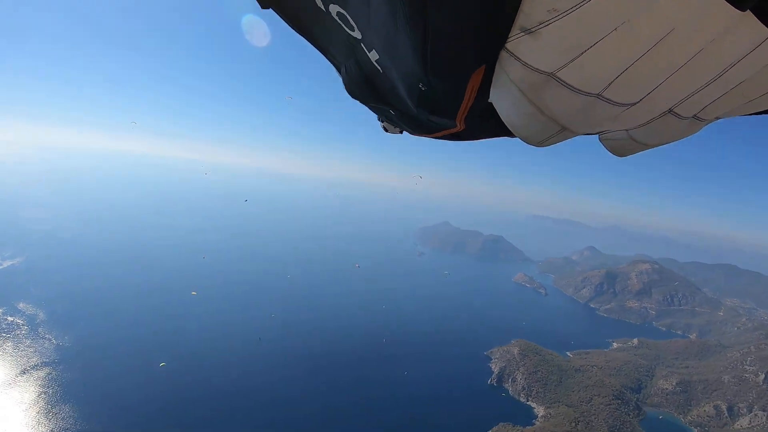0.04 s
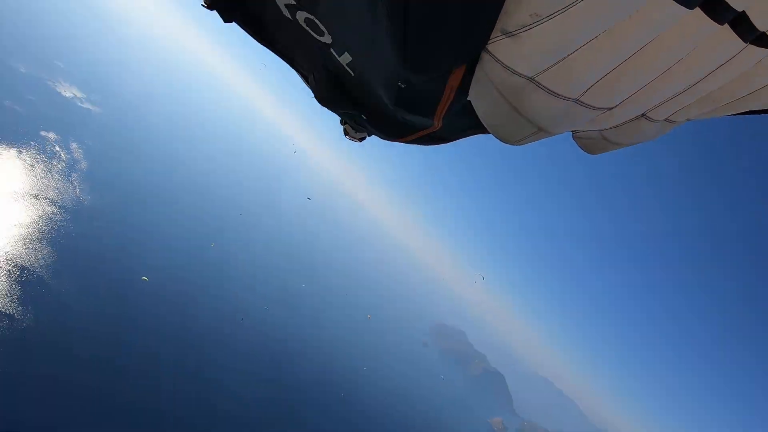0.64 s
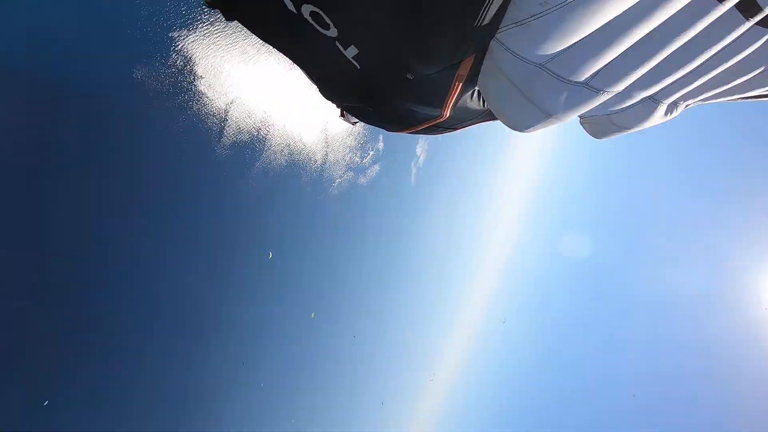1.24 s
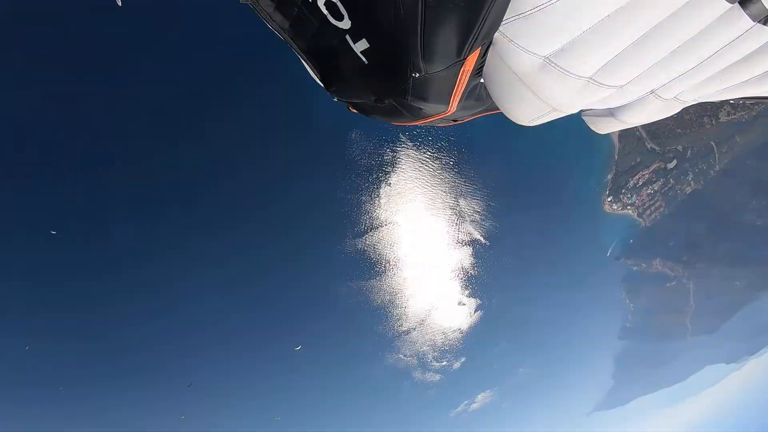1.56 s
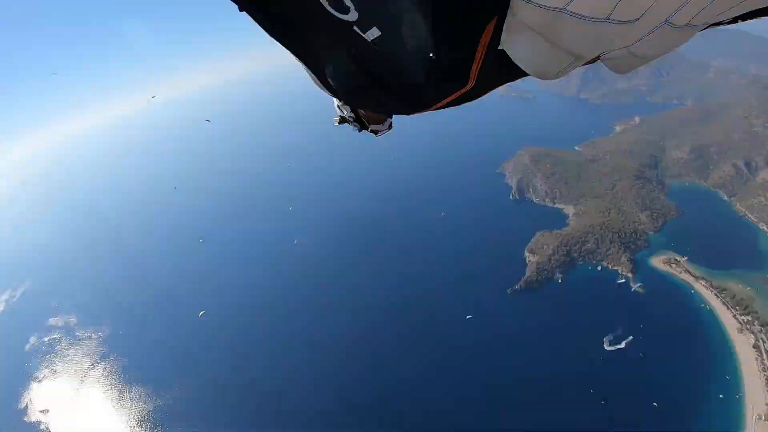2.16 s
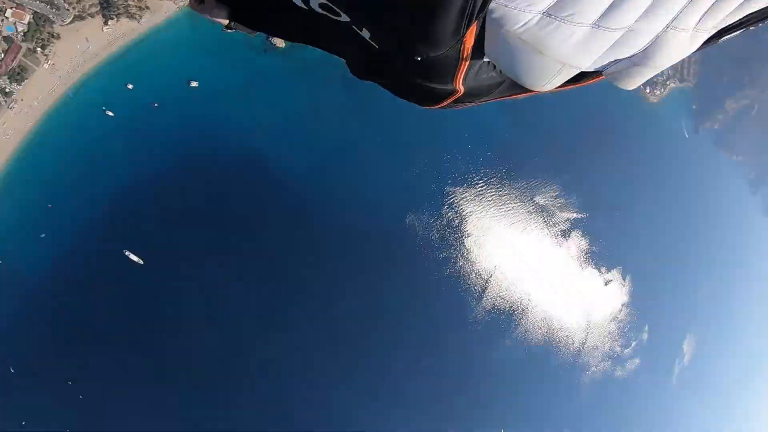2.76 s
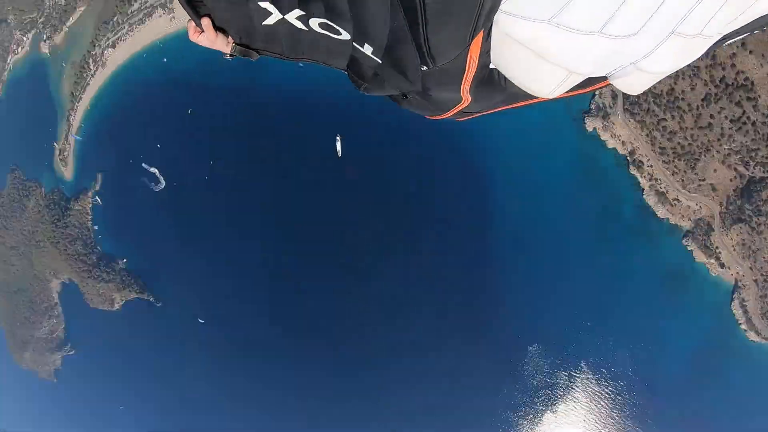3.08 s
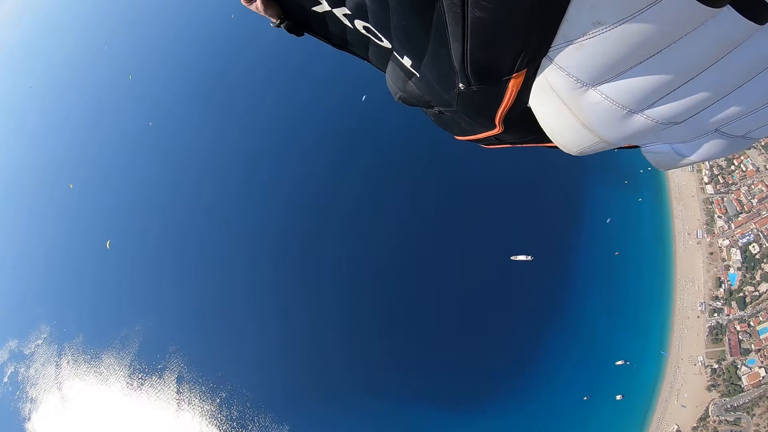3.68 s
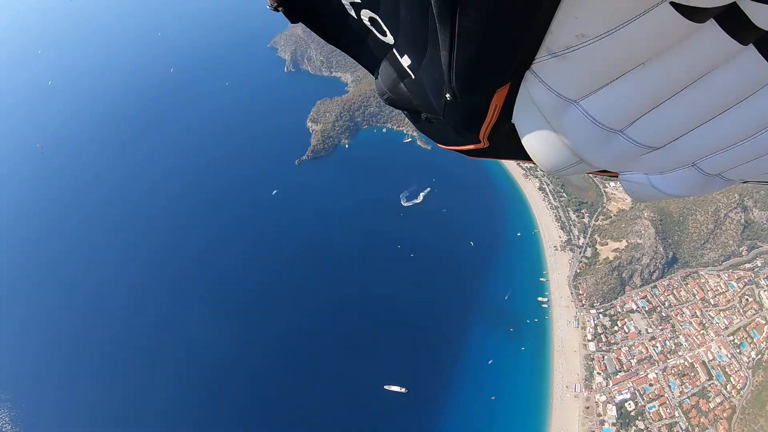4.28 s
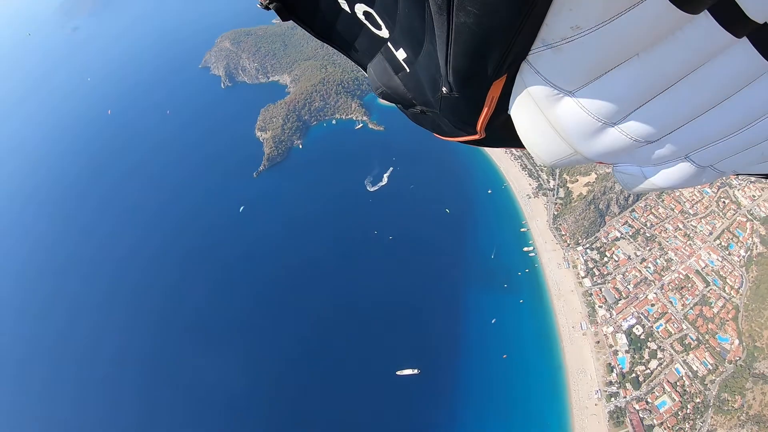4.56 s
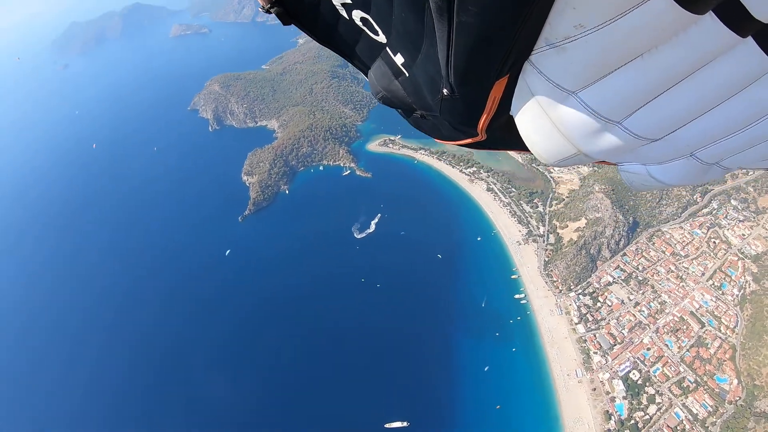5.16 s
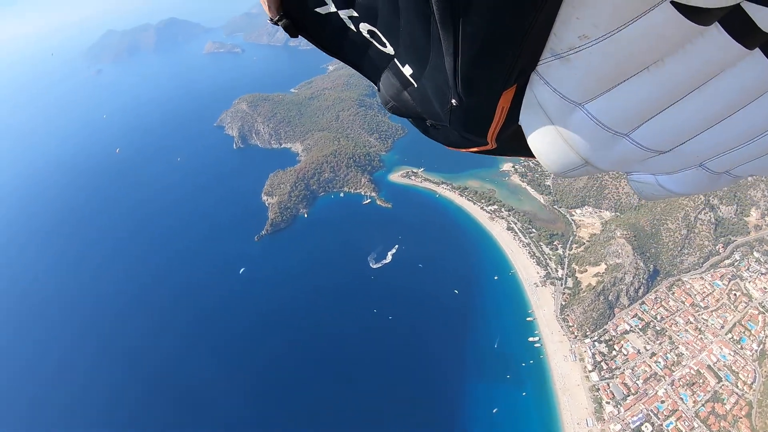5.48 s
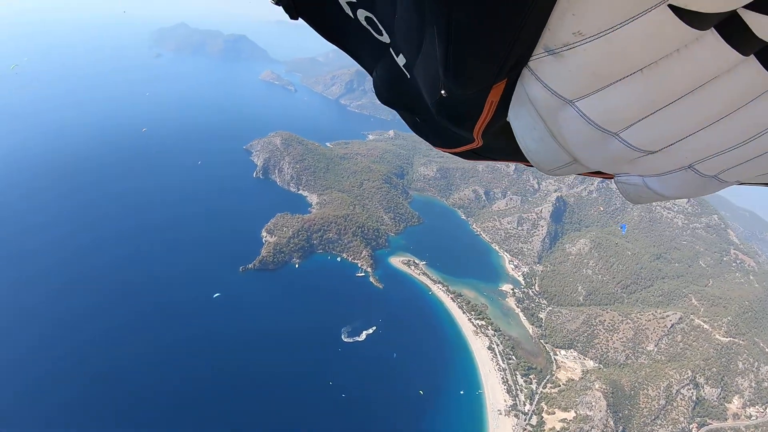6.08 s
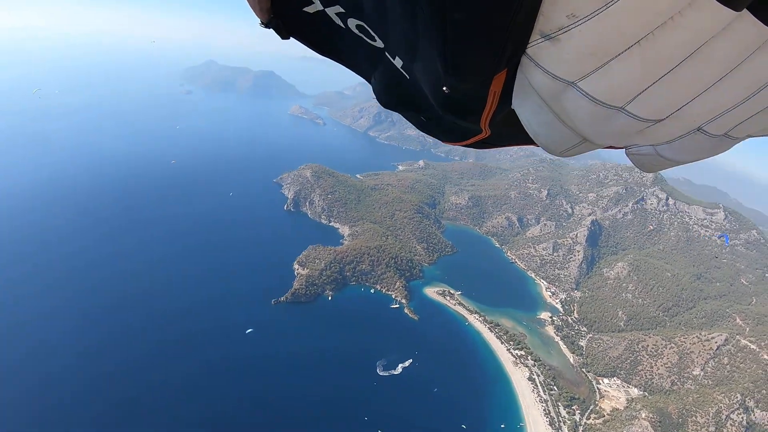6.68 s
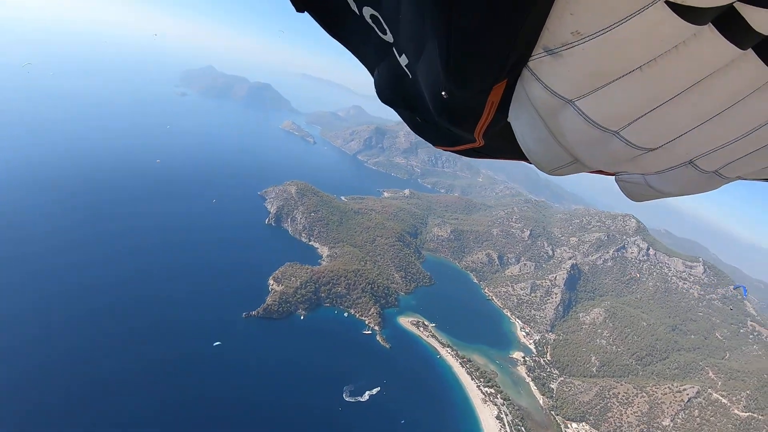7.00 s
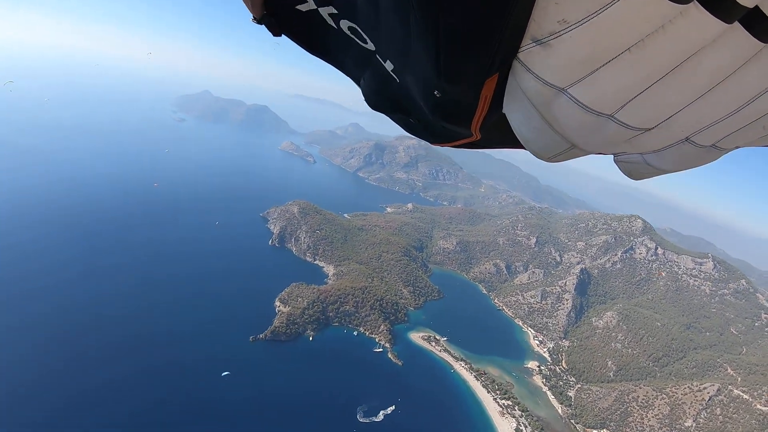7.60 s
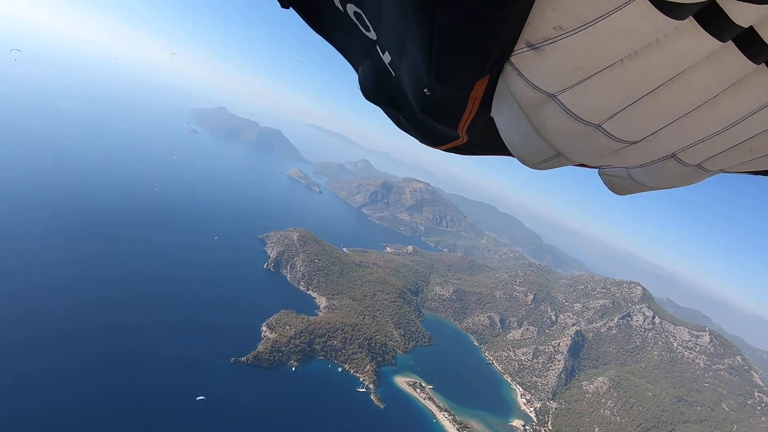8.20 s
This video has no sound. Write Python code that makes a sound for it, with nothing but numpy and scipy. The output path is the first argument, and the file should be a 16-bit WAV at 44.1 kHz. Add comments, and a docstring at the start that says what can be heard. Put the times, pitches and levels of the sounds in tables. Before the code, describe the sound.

Loud wind buffets the microphone with a fluttering rumble, a wavering drone and gusts of hiss.

```python
"""Wind on a wingsuit camera

Open air, one small camera riding on a flyer who rolls and then levels out; mono, with the wind right
on the microphone. Eddies buffet the port and the airstream roars over the housing, brighter whenever it
strikes the port. The port's narrow cavity hisses at its resonance, and vortices drone just behind
the camera. A fast limiter in the camera holds the buffeting down."""
import sys
import numpy as np
from scipy.fft import rfft, irfft, next_fast_len
from scipy.io import wavfile
from scipy.ndimage import uniform_filter1d, minimum_filter1d, map_coordinates

SR = 44100
rng = np.random.default_rng(int(sys.argv[2]) if len(sys.argv) > 2 else 0)


def digitize_waveform(pressure):
    """Quantize a signal to 16-bit integers and store it at the path in sys.argv[1].

    Rows of a 2-D input are taken as channels; values are limited to [-1, 1].
    """
    field = np.atleast_2d(pressure).T
    bounded = np.clip(field, -1, 1)
    quanta = np.round(bounded * 32767).astype(np.int16)
    wavfile.write(sys.argv[1], SR, quanta)


N = 372644

# large eddies, weakest in the middle of the roll: (time [s], buffet level [dB], roar level [dB])
LARGE_EDDIES = [(0, -9.5, -19), (.45, -16, -20), (1.2, -14, -20), (1.44, -14, -19.5), (1.6, -13.5, -19),
                (2.28, -17, -21.5), (2.36, -24, -20.5), (2.48, -20, -23), (2.8, -16.5, -18.5),
                (3.12, -20, -18), (3.3, -16, -25), (3.5, -18, -25), (3.8, -17.5, -25), (4.05, -15, -20.5),
                (4.22, -10.5, -23), (4.4, -12.5, -21.5), (4.6, -17.5, -20), (5.3, -16, -20),
                (5.9, -11.5, -19.5), (6.35, -16, -21.5), (6.75, -15, -20.5), (7.2, -14, -19.5),
                (7.75, -14, -19), (8.15, -20, -21), (8.45, -14, -20)]
# deepest thumps on the diaphragm: (time [s], level [dB])
THUMP_LEVEL = [(0, -17), (.35, -20.5), (.8, -21.5), (1.65, -18.5), (2, -26), (2.25, -21.5), (2.6, -25),
               (3.1, -21), (3.43, -26), (3.7, -25), (4.2, -19), (4.42, -19), (5.05, -24.5), (5.7, -19.5),
               (6.3, -24), (6.73, -18.5), (7.15, -24), (7.68, -18), (8.15, -24.5)]
# steady flow over the housing, under the gusts: (time [s], rush level [dB])
STEADY_FLOW = [(0, -26), (.39, -27.5), (.83, -23), (.93, -27.5), (1.65, -29), (2.08, -22.5), (2.72, -24.5),
               (2.95, -30), (3.25, -23.5), (3.95, -26.5), (4.23, -29.5), (5.03, -30), (5.36, -26),
               (5.8, -28), (6.42, -26), (6.81, -31), (7.15, -28), (7.8, -29.8), (8.45, -26.5)]
# the airstream swings onto the port: (start [s], hold [s], strength [dB], fizz flare [dB])
PORT_GUSTS = [(.12, 0.16, 2, 5), (.52, 0.35, 1.3, 1.5), (1.12, 0.051, 2.5, 3), (3.78, 0.2, 2.5, 6),
              (4.095, 0.037, 4.5, 6), (4.495, 0.12, 3.5, 6.5), (5.08, 0.1, 4.5, 5.5), (5.27, 0.37, 3.5, 3),
              (6.01, 0.075, 3.5, 8.5), (6.655, 0.065, 5, 6), (6.91, .12, 5, 6), (7.455, 0.13, 4.5, 3.5),
              (8.025, 0.082, 3, 7), (8.37, .1, 3.5, 2.5)]
RUSH_PER_GUST, HISS_PER_GUST = 1.27, 0.67  # dB for each dB of gust
# the port is briefly sheltered: (start [s], hold [s], rush change [dB], hiss change [dB])
PORT_LULLS = [(.34, 0.043, -4, -0.5), (2.82, 0.12, -6, -3.5), (4.235, .08, 1, -4.5), (4.4, .05, -3, -0.5),
              (5.645, .115, -4.5, -1), (5.92, 0.09, -5, -.5), (6.1, 0.05, -4.5, -2.5), (6.77, 0.092, 1, 0),
              (7.68, 0.09, -1.5, -1), (7.8, 0.09, 0.5, -4)]
LULL_ATTACK_S, LULL_RELEASE_S = 0.026, 0.045
# hollow tone of air crossing the housing's edge: (time [s], centre [Hz], level [dB])
EDGE_TONE = [(0, 1100, -52), (.45, 1148, -40), (.82, 1150, -30), (.98, 1102, -32), (1.5, 1097, -31),
             (1.85, 1250, -26.5), (2.15, 1753, -33.5), (2.9, 1200, -44), (3.5, 1330, -27.5),
             (4.03, 1298, -28.5), (4.2, 1200, -39), (5.05, 900, -44), (5.3, 848, -23), (5.6, 950, -34),
             (5.72, 1000, -46), (5.98, 1001, -44), (6.05, 999.5, -30), (6.45, 1221, -30), (6.67, 1196, -26),
             (6.77, 1180, -44), (6.88, 1197, -41), (7.3, 1101, -30), (7.55, 1246, -28.5), (7.7, 1101, -41),
             (7.98, 1048, -46), (8.1, 997, -34), (8.45, 904, -28)]
# vortices just behind the camera: (time [s], shedding rate [Hz], level [dB])
WAKE_VORTICES = [(0, 221.5, -20), (.45, 329, -41), (.65, 515, -24), (1, 299.2, -30), (1.25, 280.3, -26),
                 (1.5, 200.2, -35), (1.95, 280, -21.5), (2.35, 288.2, -34), (2.55, 286, -24.5),
                 (2.95, 270, -27), (3.2, 169.2, -33), (3.45, 120.2, -23), (3.7, 130.4, -17.5),
                 (4, 190, -23), (4.23, 300, -16.5), (4.38, 249.6, -26), (4.65, 180.5, -16),
                 (5, 162.3, -14.5), (5.15, 150.4, -19.5), (5.35, 198.8, -43), (5.65, 330.3, -27),
                 (5.9, 400.3, -21), (6.15, 247.6, -27), (6.42, 219.4, -34), (6.68, 278.8, -17.5),
                 (6.95, 272, -23.5), (7.2, 199, -30), (7.45, 160, -21.5), (7.8, 159.8, -17),
                 (8.15, 169.6, -21), (8.45, 189.4, -17.5)]
# the port faces the wind or lies in the lee as the flyer rolls: (time [s], hiss level [dB])
PORT_EXPOSURE = [(0, -32), (.45, -29.5), (.8, -32), (1.4, -32.8), (1.87, -31), (1.98, -28.5), (2.57, -25.5),
                 (2.82, -34), (3.04, -35), (3.23, -24.8), (3.33, -26.5), (3.48, -30.3), (4.2, -30.3),
                 (4.6, -31.5), (5.69, -30.5), (6.44, -32.5), (6.9, -32), (7.1, -34), (7.42, -35),
                 (7.66, -31), (7.85, -31.5), (8.25, -34.5), (8.45, -31)]
# treble fizz, relative to the port's exposure: (time [s], level [dB])
FIZZ_BALANCE = [(.08, -17), (.35, -11), (.85, -12), (1.0, -16), (1.9, -15.5), (2.6, -13), (3.3, -12.5),
                (3.6, -15.5), (4.3, -15.5), (4.65, -11.5), (5.2, -13), (5.7, -10), (5.85, -14),
                (6.5, -12.5), (6.86, -11), (7.3, -14), (7.66, -9), (7.77, -15.5), (8.45, -11)]
# airy whistle at the port's lip, sinking in the longer gusts: (time [s], pitch [Hz])
LIP_WHISTLE = [(.1, 5333), (.19, 4900), (.3, 4948), (.43, 5150), (.56, 4880), (.68, 4650), (.8, 4850),
               (.92, 5350), (1.55, 5050), (2.1, 5500), (3.05, 5480), (3.65, 5284), (4, 5450), (5, 5420),
               (5.2, 5100), (5.33, 4950), (5.58, 4950), (5.78, 5800), (5.9, 5422), (6.12, 5321),
               (6.21, 5950), (6.34, 5344), (6.86, 5475), (6.99, 4964), (7.1, 5436), (7.42, 5377),
               (7.55, 4893), (7.67, 5450), (7.755, 6250), (7.87, 5420), (8.3, 5330), (8.42, 4981)]
WHISTLE_REST_HZ, WHISTLE_WANDER_HZ, WHISTLE_FULL_BEND_HZ = 5440, 99.4, 450
# a long gust slips off the port: (start [s], length [s], level before the port's loss [dB])
GUST_SLIPS = [(.89, 0.21, -42), (5.608, .22, -38), (7.603, 0.21, -44)]
SLIP_START_HZ, SLIP_END_HZ, SLIP_LOSS_DB_PER_OCTAVE = 9500, 5870, 34

# colours of the wind at the microphone: (frequency [Hz], relative level [dB])
THUMP_SPECTRUM = [(8, -23.5), (20, 0), (32, -3.5), (55, 1.5), (75, 4.5), (110, -13.5), (250, -50)]
BUFFET_SPECTRUM = [(35, -28), (65, -3), (90, -2), (120, 0.5), (160, -0.5), (240, -4.5), (330, -15),
                   (600, -28), (1500, -70.5)]
ROAR_SPECTRUM = [(130, -30.5), (240, -3.5), (320, 0.5), (500, -4), (720, -8), (1000, -16), (1600, -22),
                 (3000, -41), (6000, -78)]
RUSH_SPECTRUM = [(350, -20), (650, -0.5), (950, 1), (1300, -2), (1750, -6), (2300, -11.5), (2800, -15),
                 (3300, -20.5), (4500, -20), (7000, -51)]
CAVITY_SPECTRUM = [(2200, -21.5), (3400, -21), (4000, -11), (4700, -3), (5500, -2), (6100, -3.5),
                   (7000, -13.5), (8200, -30), (10000, -46.5)]
FIZZ_SPECTRUM = [(3000, -6.5), (5000, 1.5), (7000, -5.5), (8000, -4), (9000, -12.5), (10000, -24),
                 (11000, -33.5), (12000, -47.5), (14300, -47.5), (15500, -47)]
PUFF_SPECTRUM = [(5, 4), (30, 3.5), (120, -8), (400, -5), (900, -37)]
# shapes of the pitched bands: (offset from centre [Hz], relative level [dB])
EDGE_BAND = [(2, 6), (170, -1.5), (380, -9), (650, -19), (950, -35.5)]
WAKE_BAND = [(2, -5.5), (15, 1), (45, -7.5), (80, -9.5), (170, -28.5)]
WHISTLE_BAND = [(2, -5.5), (170, -5), (360, -8.5), (680, -11.5), (1300, -25)]
SLIP_BAND = [(2, 1), (330, 1), (650, -8), (1200, -26)]


def buffeting():
    """Large eddies press right on the diaphragm: slow thumps under a throbbing rumble."""
    buffet_db, _ = curves(LARGE_EDDIES)
    thump_db, = curves(THUMP_LEVEL)
    thump_gain = amp(thump_db + 1.6 * wobble(12))
    thump = thump_gain * unit(limiter(noise(THUMP_SPECTRUM), ceiling_db=2.5, hold_s=0.037))
    rumble = amp(buffet_db + 1.06 * wobble(14)) * noise(BUFFET_SPECTRUM)
    return limiter(thump + rumble, ceiling_db=-6.5, hold_s=0.015)


def airstream(flutter):
    """Smaller eddies roar and rush over the housing around the microphone; its edge sounds hollow."""
    _, roar_db = curves(LARGE_EDDIES)
    flow_db, = curves(STEADY_FLOW)
    gust_db, _ = swells(PORT_GUSTS, attack_s=0.026, release_s=0.023)
    lull_db, _ = swells(PORT_LULLS, LULL_ATTACK_S, LULL_RELEASE_S)
    rush_db = flow_db + RUSH_PER_GUST * gust_db + lull_db
    edge_hz, edge_db = curves(EDGE_TONE)
    roar = amp(roar_db + 0.37 * wobble(14) + 0.5 * flutter) * noise(ROAR_SPECTRUM)
    rush = amp(rush_db + 0.47 * wobble(22) + 1.3 * flutter) * noise(RUSH_SPECTRUM)
    edge = amp(edge_db) * narrow_noise(edge_hz, EDGE_BAND)
    return roar + rush + edge


def wake():
    """Vortices peel off just behind the camera at a loose, wandering rate: a throaty drone."""
    shedding_hz, level_db = curves(WAKE_VORTICES)
    throb_db = 1.5 * wobble(18)
    wandering_hz = shedding_hz * (1 + 0.09 * wobble(40))
    return amp(level_db + throb_db) * narrow_noise(wandering_hz, WAKE_BAND)


def port_hiss(flutter):
    """The finest turbulence rings the microphone port's cavity, whistles at its lip and fizzes on top."""
    _, lull_db = swells(PORT_LULLS, LULL_ATTACK_S, LULL_RELEASE_S)
    exposure_db = curves(PORT_EXPOSURE)[0] + lull_db + 0.59 * wobble(22)
    # the hiss hangs on after a gust a little longer than the rush
    gust_db, flare_db = swells(PORT_GUSTS, attack_s=0.024, release_s=0.063)
    whistle_hz, = curves(LIP_WHISTLE)
    bend = np.minimum(np.abs(whistle_hz - WHISTLE_REST_HZ) / WHISTLE_FULL_BEND_HZ, 1)
    whistle_gain = amp(-3 + 4.5 * bend)  # against the cavity, louder when bent from rest
    whistle = whistle_gain * narrow_noise(whistle_hz + WHISTLE_WANDER_HZ * wobble(25), WHISTLE_BAND)
    # cavity and whistle share the power of the flow
    ring = (noise(CAVITY_SPECTRUM) + whistle) / np.sqrt(1 + whistle_gain ** 2)
    hiss = amp(exposure_db + HISS_PER_GUST * gust_db + 1.23 * flutter + 0.52 * wobble(70)) * ring
    fizz_db = exposure_db + curves(FIZZ_BALANCE)[0] + flare_db
    fizz = amp(fizz_db + 1.2 * flutter + 0.5 * wobble(5.8)) * noise(FIZZ_SPECTRUM)
    return hiss + fizz


def gust_slips(flutter):
    """As the airstream slips off the port, a faint, thin hiss falls to the cavity's pitch and fades."""
    t = np.arange(N) / SR
    hiss = np.zeros(N)
    for start, length, level_db in GUST_SLIPS:
        progress = np.clip((t - start) / length, 0, 1)
        pitch_hz = SLIP_END_HZ + (SLIP_START_HZ - SLIP_END_HZ) * (1 - progress) ** 2
        # the port passes less the further the pitch lies above its resonance
        loss_db = SLIP_LOSS_DB_PER_OCTAVE * np.log2(pitch_hz / SLIP_END_HZ)
        envelope = np.sqrt(np.abs(np.sin(np.pi * progress)))
        hiss += amp(level_db - loss_db) * envelope * narrow_noise(pitch_hz, SLIP_BAND)
    return amp(flutter) * hiss


def amp(db):
    """Decibels to gain."""
    return 10 ** (np.asarray(db) / 20)


def unit(x):
    """Scale to rms 1."""
    return x / np.sqrt(np.mean(x ** 2) + 1e-20)


def curves(rows):
    """One value per sample for each column after the time."""
    times, *columns = np.transpose(rows)
    return [np.interp(np.arange(N) / SR, times, column) for column in columns]


def swells(rows, attack_s, release_s):
    """Each (start, hold, ...) row rises, holds and falls away; one curve for each further column."""
    t = np.arange(N) / SR
    starts, holds, *columns = np.transpose(rows)
    ramps = [np.minimum((t - start) / attack_s, 1 - (t - start - hold) / release_s)
             for start, hold in zip(starts, holds)]
    envelopes = np.clip(ramps, 0, 1)
    return [column @ envelopes for column in columns]


def wobble(rate_hz):
    """A smooth random curve through rate_hz knots a second."""
    knots = rng.standard_normal(int(N * rate_hz / SR) + 4)
    return map_coordinates(knots, [np.arange(N) * rate_hz / SR])


def filtered(x, response):
    """Filter x by a gain given as a function of frequency."""
    size = next_fast_len(N + 8192)
    hz = np.fft.rfftfreq(size, 1 / SR)
    return irfft(rfft(x, size) * response(hz), size)[:N]


def noise(spectrum):
    """Noise of rms 1 coloured by (frequency [Hz], level [dB]) points, silent outside them."""
    points_hz, points_db = np.transpose(spectrum)

    def colour(hz):
        return amp(np.interp(np.log(hz + 1), np.log(points_hz), points_db, left=-120, right=-120))
    return unit(filtered(rng.standard_normal(N), colour))


def narrow_noise(centre_hz, band):
    """Noise of rms 1 around a moving centre, shaped on both sides by band."""
    phase = 2 * np.pi * np.cumsum(centre_hz) / SR
    return unit(noise(band) * np.cos(phase) + noise(band) * np.sin(phase))


def limiter(x, ceiling_db, hold_s):
    """Turn the gain down smoothly around every peak above the ceiling."""
    span = max(int(hold_s * SR), 2)
    needed_gain = np.minimum(1, amp(ceiling_db) / (np.abs(x) + 1e-9))
    return x * uniform_filter1d(minimum_filter1d(needed_gain, span), span)


def scene():
    """The wind at the microphone; it flutters in quick puffs, partly in step with the large eddies."""
    pressure = buffeting()
    flutter = unit(noise(PUFF_SPECTRUM) + 0.42 * unit(pressure))
    wind = pressure + wake() + airstream(flutter) + port_hiss(flutter) + gust_slips(flutter)
    return wind[None]


def record(dry):
    """The camera's one channel: a fast limiter on the peaks, and nothing above 15550 Hz."""
    limited = limiter(dry[0], ceiling_db=-2.0, hold_s=0.011)
    return filtered(limited, lambda hz: hz < 15550)[None]


dry = scene()
out = record(dry)
digitize_waveform(out)
```